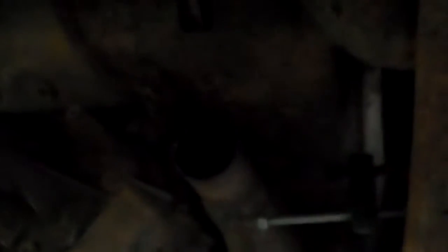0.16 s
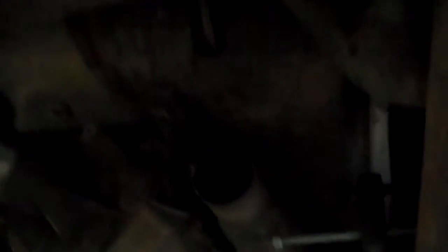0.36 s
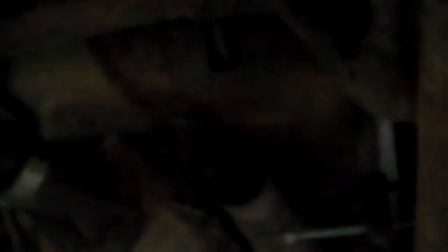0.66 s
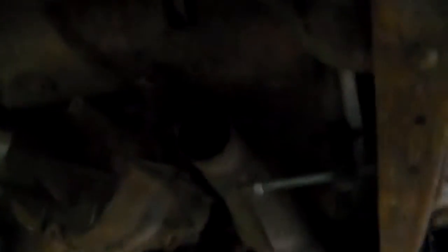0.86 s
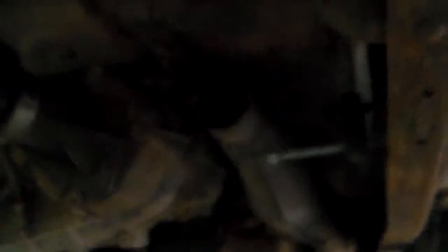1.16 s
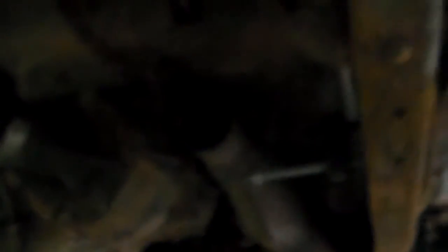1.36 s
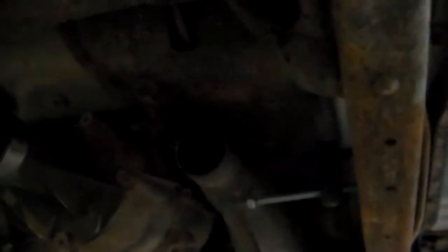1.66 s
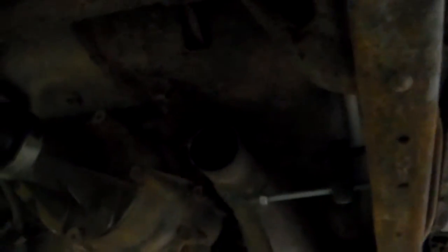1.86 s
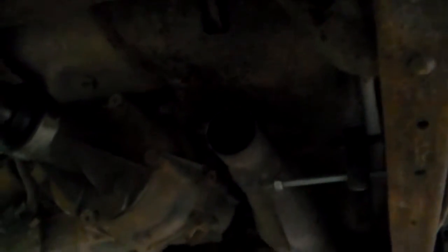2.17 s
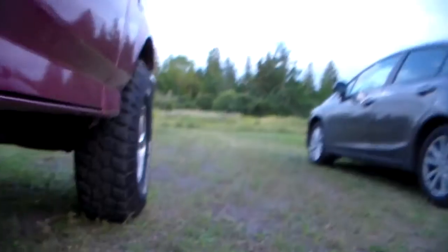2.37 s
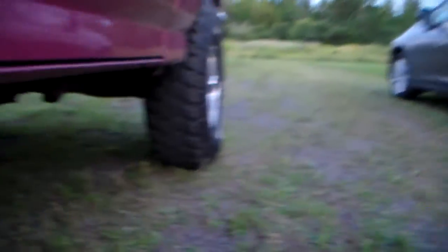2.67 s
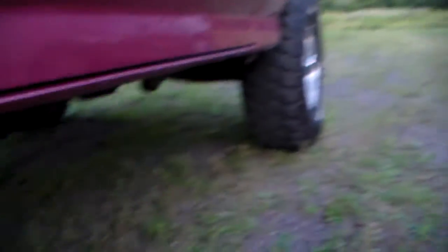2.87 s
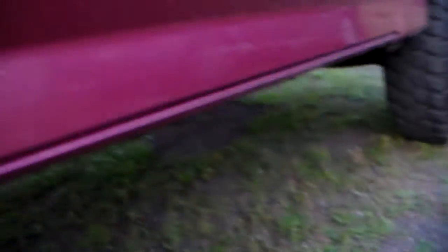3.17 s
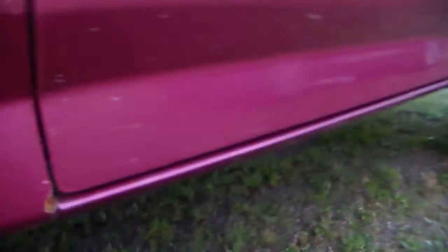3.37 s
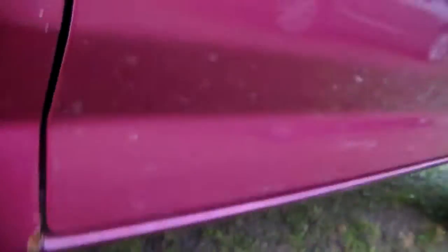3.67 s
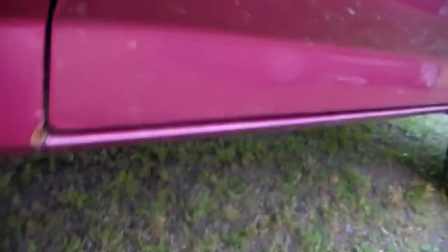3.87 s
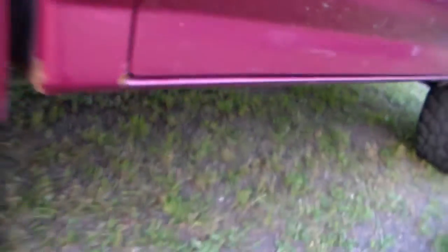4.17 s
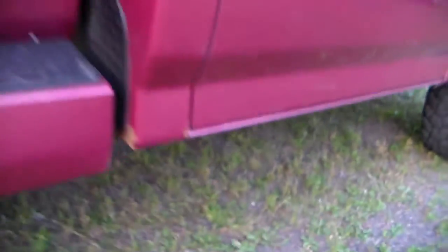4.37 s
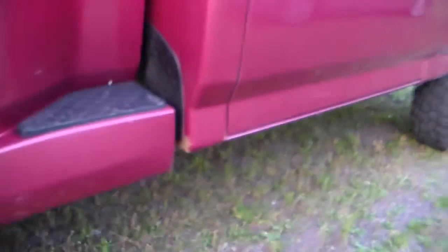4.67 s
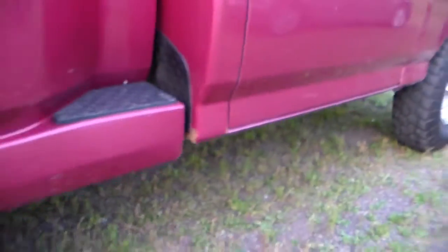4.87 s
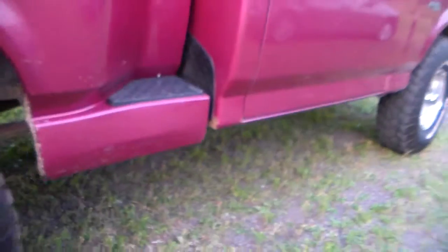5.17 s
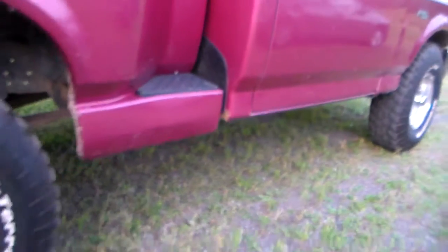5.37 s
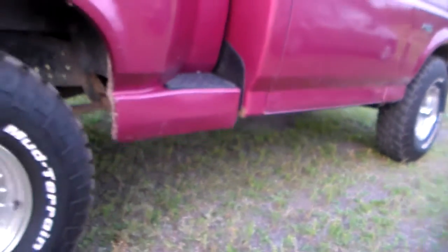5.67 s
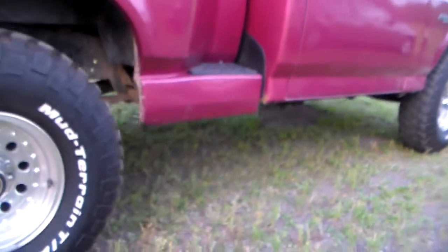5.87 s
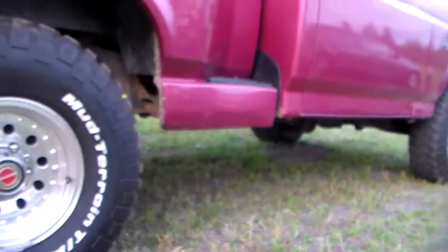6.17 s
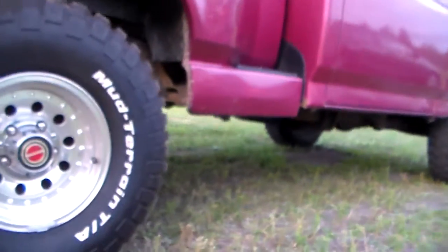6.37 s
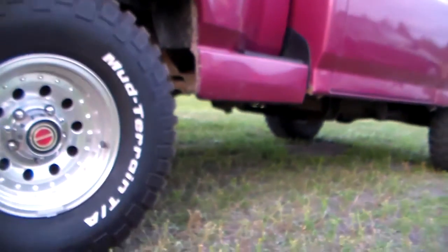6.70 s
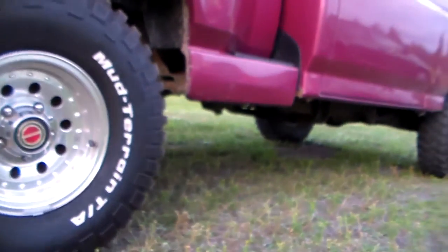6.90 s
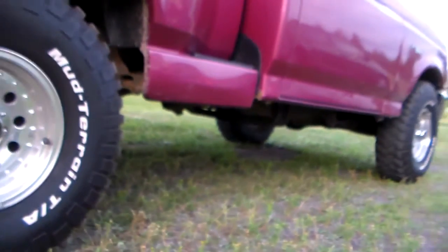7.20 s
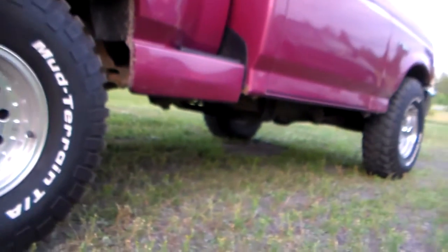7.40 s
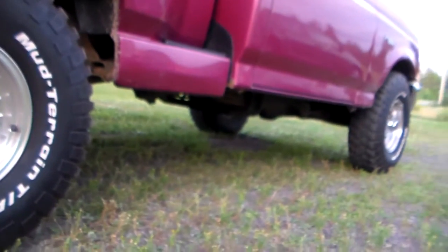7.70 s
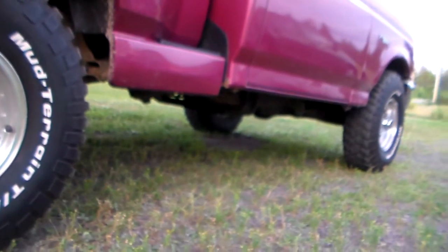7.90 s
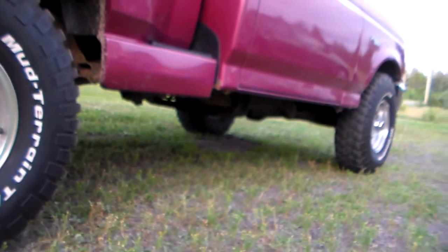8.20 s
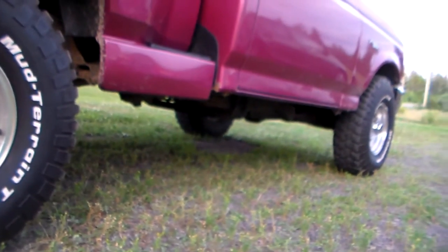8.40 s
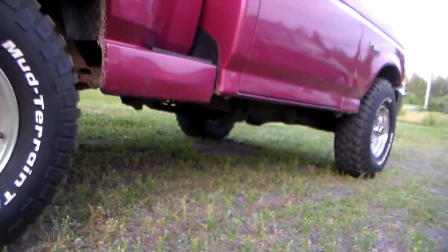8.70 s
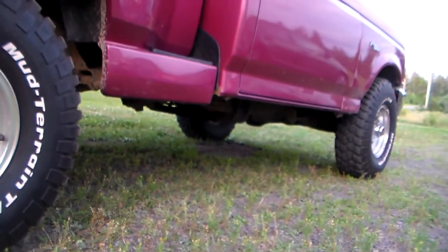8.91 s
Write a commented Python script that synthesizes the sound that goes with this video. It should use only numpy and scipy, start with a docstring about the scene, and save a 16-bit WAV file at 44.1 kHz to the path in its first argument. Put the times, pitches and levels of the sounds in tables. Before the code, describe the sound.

A V8 pickup with no muffler idles with a raspy, throbbing exhaust, loud from underneath, then suddenly quieter from beside it.

```python
"""An unmuffled V8 idles on grass. Each firing is an impulse that excites the low modes of the open pipe
and releases a turbulent jet, heard as a ringing rasp with sharp ticks. Three thin panels resonate,
and late burning adds pops. The microphone first lies under the truck by the pipe; after a hard cut
it stands beside the truck and drifts from the door to the rear wheel."""
import sys
import numpy as np
from scipy import signal
from scipy.io import wavfile
from scipy.ndimage import uniform_filter1d

SR = 44100
rng = np.random.default_rng(int(sys.argv[2]) if len(sys.argv) > 2 else 0)


def unload_audio(sound):
    """Save the sound as a 16-bit wav file, at the path given as the first command line argument."""
    columns = np.transpose(np.atleast_2d(sound))
    # keep every value between -1 and 1, then stretch to whole-number steps
    steps = np.round(np.clip(columns, -1, 1) * 32767)
    wavfile.write(sys.argv[1], SR, steps.astype(np.int16))


N = 399105

# A stance is 0 under the truck or 1 beside it. A place is 0 under, 1 by the door or 2 by the rear wheel.
# steady idle, a row per stance: firings_per_s, opening_count_firings
IDLE_BEAT = [(45.16, -4.72), (45.09, -4.95)]
# wander of the crank from that beat, per stance: time_s, lead_firings
CRANK_WANDER = [
    [(0.0, 0.0), (0.25, -0.08), (0.54, 0.07), (0.68, 0.01), (1.74, 0.01), (1.88, -0.09), (2.1, 0.1),
     (2.322, -0.07)],
    [(2.322, 0.02), (2.922, 0.1), (3.422, 0.02), (3.582, 0.16), (3.822, -0.08), (4.642, 0.02),
     (4.942, -0.13), (5.162, -0.02), (6.442, -0.04), (6.582, -0.21), (6.802, 0.0), (6.942, -0.16),
     (7.662, 0.17), (7.882, -0.01), (8.042, 0.15), (8.202, -0.04), (9.05, 0.14)],
]
# irregular burns, nearly all weak: time_s, change_db
ODD_BURNS = [(.54, -7.5), (.699, -2.5), (1.007, -7), (1.86, -6.5), (2.269, -3.5), (2.714, -2), (3.069, -4),
             (3.644, -3.5), (4.357, 1), (4.913, -0.5), (5.998, -3.5), (6.556, -3), (6.887, -4), (7.043, -5),
             (8.148, -4)]
# low modes of pipe and ground gap, per stance: pitch_hz, width_hz, travel_ms
PIPE_MODES = [
    [(44.2, 9.1, 3.7), (109.8, 14.0, 11.4), (132.7, 10.5, 2.0), (159.1, 34.5, 9.6)],
    [(41.9, 14.7, 3.1), (88.2, 26.7, 9.9), (109.9, 8.0, 1.1), (187.4, 8.0, 7.9)],
]
# cylinders in firing order, per stance: late_ms, kick_db for each of 4 modes, puff_db at 3 pitches
FIRING_ORDER = [
    [(-0.5, -12.5, -10.3, -16.5, -17.0, -1.3, -3.4, 0.3), (0.4, -11.8, -8.2, -35.4, -11.7, 0.4, -1.6, -0.9),
     (-0.3, -11.1, -13.1, -18.7, -15.5, -0.6, -0.5, 2.9),
     (-0.3, -14.3, -10.2, -23.3, -14.9, -1.8, -1.6, -3.4), (0.7, -11.8, -3.8, -24.1, -13.2, 2.1, 2.1, -0.8),
     (-0.3, -12.6, -9.0, -15.4, -17.2, 0.3, -2.4, 0.9), (0.1, -14.7, -6.7, -22.4, -11.0, -1.5, 0.4, -1.0),
     (0.2, -12.7, -3.0, -17.0, -11.3, 0.9, 3.0, -0.7)],
    [(-0.7, -19.9, -19.2, -23.2, -34.6, -2.8, -3.4, -0.5),
     (-0.1, -18.3, -15.5, -43.2, -60.8, -1.4, 1.2, -1.4),
     (0.6, -16.5, -18.3, -32.9, -34.5, -0.4, 1.3, -0.4),
     (-0.7, -19.9, -18.6, -22.6, -33.9, -2.7, -2.2, 0.3),
     (0.6, -15.9, -21.4, -35.8, -56.5, 1.8, -2.1, -0.5),
     (-0.8, -17.5, -21.9, -29.0, -34.6, -0.5, -1.5, 1.4),
     (-0.1, -16.7, -17.2, -29.7, -39.1, -0.2, 0.6, -1.1), (1.2, -16.2, -17.1, -57.5, -32.8, 2.9, 2.5, 1.3)],
]
# pitches of those three puff columns: low_hz, middle_hz, high_hz
PUFF_PITCHES = (1200, 3000, 9000)
# burn-to-burn deviation of the kicks, a row per stance: spread_db for each of 4 modes
KICK_SPREAD = [(0.3, 1.0, 1.1, 1.1), (0.37, 1.5, 1.8, 2.2)]
# low pulses at normal burn, per stance: time_s, level_db
BOOM_LEVEL = [
    [(0.0, -7.5), (0.6, -9), (2.32, -9)],
    [(2.33, -18), (4.3, -18), (6.5, -19), (9.05, -19)],
]
# the two jets of a firing, a row per stance:
# start_firings, rise_firings, fall_firings, second_delay_firings, second_db, steady_flow_db
JET_SHAPE = [(0.289, 0.035, 0.31, 0.39, -8, -10.5), (.38, 0.046, 0.27, .35, -9.5, -6.5)]
# rasp at normal burn, per stance: time_s, level_db, treble_tilt_db_per_octave
RASP_LEVEL = [
    [(0.0, -28.5, 2), (0.3, -31.5, -1.5), (0.45, -30, 3), (0.66, -33.5, -5), (0.88, -31.5, 2.5),
     (1.05, -32.5, 1), (1.4, -31.5, 0), (2.32, -31, -1)],
    [(2.33, -48.5, -1.5), (2.5, -48, -0.5), (3.0, -47.5, -2), (4.2, -48, 0), (5.3, -46, -3.5),
     (6.0, -45, -2), (6.6, -46, 1), (7.6, -45.5, -3.5), (9.05, -46, -3.5)],
]
# likeness of the jet noise in the two microphone ports: frequency_hz, coherence
PORT_COHERENCE = [(300, 0.99), (1200, 0.97), (2500, 0.88), (5000, 0.65), (8000, 0.12), (13000, 0.51)]
# broadband spectrum of the rasp, per place: frequency_hz, relative_db
RASP_SPECTRA = [
    [(130, -18), (220, -2), (300, -14.5), (430, -19), (600, -13.5), (850, -22.5), (1200, -6), (1600, -17.5),
     (2500, -13.5), (3600, -24), (4700, -21), (5700, -22), (7800, -35.5), (13500, -35)],
    [(130, -22.5), (220, 1), (300, -1.5), (430, -14.5), (600, -9.5), (850, -13), (1200, -10), (1600, -17.5),
     (2500, -17), (3600, -22.5), (4700, -25), (5700, -28), (7800, -34), (13500, -39)],
    [(130, -23), (220, -0.5), (300, -3), (430, -11), (600, -16), (850, -22), (1200, -15), (1600, -20),
     (2500, -18.5), (3600, -28), (4700, -30.5), (5700, -24.5), (7800, -44), (13500, -47)],
]
# resonances of pipe end, frame and ground gap, per place: pitch_hz, width_hz, relative_db
RING_MODES = [
    [(1110, 73, -2.5), (1440, 14, 1.5), (1709, 18, -3.5), (2259, 56, 0), (2663, 134, -5), (2890, 18, -20),
     (3220, 45, -7), (3497, 46, -5), (3610, 68, -9), (5350, 54, -13), (5930, 120, -18)],
    [(1100, 20, 2.5), (1723, 6.7, -3.5), (2097, 31, -2.5), (2560, 58, -3.5), (3357, 68, -11.5),
     (5030, 89, -19), (5810, 60, -15.5)],
    [(1200, 33, 2), (1725, 13, -7.5), (2484, 150, -7), (3700, 99, -11.5), (3870, 48, -16),
     (5190, 57, -20.5), (5550, 150, -25)],
]
# resonance of each thin panel: pitch_hz, width_hz
PANEL_MODES = [(709, 6.6), (664.7, 5.3), (523.4, 19)]
# vibration of the panels, per stance: time_s, level_db for each of 3 panels
PANEL_LEVELS = [
    [(0.0, -41, -48, -43), (0.5, -34, -57, -43), (1.2, -40, -47, -45.5), (1.57, -34.5, -61, -46.5),
     (1.72, -42.5, -51, -49), (2.07, -33, -60, -47), (2.32, -41.5, -52, -43)],
    [(2.33, -43, -47, -47), (3.0, -56.5, -50.5, -57.5), (3.8, -44.5, -49, -49), (4.3, -45, -48, -65),
     (5.0, -54, -45, -60), (5.5, -56, -53.5, -54), (6.1, -56, -57, -73), (6.6, -48, -51, -59),
     (7.6, -46, -50.5, -58.5), (9.05, -52, -46.5, -52)],
]
# size of the faintest ticks before filtering: time_s, level_db
TICK_FLOOR = [(0, -32), (2.32, -25.5), (2.33, -33.5), (3.2, -33), (4.5, -40.5), (6, -39.5), (9.05, -38.5)]
# spectrum of a tick: frequency_hz, gain_db
TICK_SPECTRUM = [(1500, -32), (4000, -8), (7000, -7.5), (11000, -1.5), (14000, -10)]
# pops of late burning, per stance: start_s, level_db, pitch_hz
LATE_BURNS = [
    [(0.0692, -18, 2580), (0.0877, -13, 2250), (0.1321, -16, 1010), (0.1999, -19, 1180),
     (0.3765, -16.5, 1170), (0.4209, -12, 2550), (0.4399, -13, 1100), (0.5511, -20, 2370),
     (0.621, -20, 2060), (0.7327, -19, 2670), (0.7741, -22, 2320), (0.7971, -8, 2590), (0.8395, -16, 2630),
     (0.9073, -13.5, 3640), (1.1513, -12.5, 2190), (1.5698, -19, 1100), (1.6162, -11, 1140),
     (1.6821, -18, 1750), (1.7948, -19, 1110), (2.0807, -16, 2280), (2.1495, -15, 2400),
     (2.2149, -16, 2290)],
    [(3.1265, -29, 1090), (3.3026, -32, 1100), (3.5241, -27, 2530), (3.6598, -23, 2570),
     (4.3722, -36, 1270), (4.483, -24, 1230), (4.5478, -27, 1270), (4.6611, -22.5, 1250),
     (4.7259, -31, 1120), (4.7693, -28, 2450), (5.0582, -29, 2480), (5.0811, -32, 1230),
     (5.5904, -26, 2370), (5.7256, -28, 1200), (5.7935, -22, 1240), (5.8354, -31, 1200),
     (5.8543, -33, 1130), (5.9012, -24, 1230), (5.9481, -29, 920), (5.9666, -24, 1180), (6.0125, -22, 2310),
     (6.0788, -23.5, 2090), (6.1467, -20, 1194), (6.3218, -30, 1200), (6.6775, -40, 1200),
     (6.7224, -22.5, 2530), (6.8551, -27, 2730), (6.902, -30, 2520), (7.2741, -26, 2540),
     (8.0943, -24, 2540), (8.1641, -31, 1170), (8.2075, -32, 1190), (8.3397, -38, 1180),
     (8.4504, -19.5, 1200), (8.5178, -24, 1200), (8.9802, -30, 1210)],
]
# imbalance of the two ports: frequency_hz, left_over_right_db
PORT_BALANCE = [(60, -1.14), (200, -1), (600, 0.8), (1400, -0.4), (3000, -1.5), (6000, -2.4), (9500, 3),
                (13000, 2)]

CUT_S, WALK_START_S, WALK_END_S = 2.322, 4.55, 6.96
LOPE_PERIOD, LOPE_TOP, LOPE_LAG = 16, 0.6, 1.4  # firings: two engine cycles, strongest burn, crank lag
LOPE_LEAD_FIRINGS, LOPE_DB, KICK_SIGMA_MS = (0.05, 0), (0.7, 0.04), (0.49, 0.062)  # per stance
BROADBAND_DB, RINGING_DB = (-3, -1, -4), (-3, -1, 0)  # the two parts of the rasp, per place
BURN_BOOM, BURN_TILT = 0.59, 0.7  # dB of boom and dB per octave of treble for each dB of burn


def gain_of(db):
    """Amplitude ratio of a level in decibels."""
    return 10 ** (np.asarray(db) / 20)


def unit_rms(x):
    """Normalisation to a mean power of 1."""
    return x / np.sqrt(np.mean(x ** 2) + 1e-20)


def spectrum_at(points, hz):
    """Interpolation of a spectrum on a logarithmic frequency axis."""
    known_hz, value = np.transpose(points)
    return np.interp(np.log(hz + 1), np.log(known_hz + 1), value)


def curves_at(rows, t):
    """Linear interpolation of each column of a table in time."""
    time_s, *columns = np.transpose(rows)
    return [np.interp(t, time_s, column) for column in columns]


def coloured(x, gain):
    """Minimum-phase filtering, with gains evenly spaced from 0 Hz to half the sample rate."""
    log_gain = np.log(np.maximum(np.r_[gain, gain[-2:0:-1]], 1e-5))
    taps = np.fft.ifft(np.exp(np.conj(signal.hilbert(log_gain)))).real[:len(gain)]
    return signal.oaconvolve(x, taps.reshape((1,) * (x.ndim - 1) + (-1,)), axes=-1)[..., :x.shape[-1]]


def impulses(t, times_s, size):
    """An impulse train, each impulse shared between its two nearest samples."""
    position = np.clip((times_s - t[0]) * SR, 0, len(t) - 2)
    index, train = position.astype(int), np.zeros(len(t))
    np.add.at(train, index, size * (1 - position + index))
    np.add.at(train, index + 1, size * (position - index))
    return train


def crank_phase(t, start_s, stance):
    """Phase modulation: the count of firings is a steady beat plus wander and a periodic lope."""
    firings_per_s, opening_count = IDLE_BEAT[stance]
    steady = opening_count + firings_per_s * (t - start_s)
    lope = np.cos(2 * np.pi * (steady - LOPE_TOP - LOPE_LAG) / LOPE_PERIOD)
    return steady + curves_at(CRANK_WANDER[stance], t)[0] + LOPE_LEAD_FIRINGS[stance] * lope


def burn_strength(t, crank, stance, half_width_s=0.013):
    """Amplitude modulation in dB: the burn swings with the lope and dips at weak firings."""
    changes = sum(db * np.exp(-((t - time_s) / half_width_s) ** 2) for time_s, db in ODD_BURNS)
    return LOPE_DB[stance] * np.cos(2 * np.pi * (crank - LOPE_TOP) / LOPE_PERIOD) + changes


def pipe_boom(t, crank, stance, shared=0.75):
    """Modal superposition: each firing kicks every low mode into a damped sine after its travel time."""
    count = np.arange(np.ceil(crank[0]), crank[-1])
    cylinder = np.array(FIRING_ORDER[stance])[count.astype(int) % 8]
    chance = rng.standard_normal((len(count), 5))
    # the three upper modes vary partly together
    chance[:, 1:4] = shared * chance[:, 4:] + np.sqrt(1 - shared ** 2) * chance[:, 1:4]
    age_s, modes = np.arange(SR // 4) / SR, 0
    for k, (pitch_hz, width_hz, travel_ms) in enumerate(PIPE_MODES[stance]):
        arrival_s = np.interp(count, crank, t) + (cylinder[:, 0] + travel_ms) / 1000
        kicks = impulses(t, arrival_s, gain_of(cylinder[:, 1 + k] + KICK_SPREAD[stance][k] * chance[:, k]))
        response = np.exp(-np.pi * width_hz * age_s) * np.sin(2 * np.pi * pitch_hz * age_s)
        modes = modes + signal.oaconvolve(kicks, response)[:len(t)]
    kick_shape = signal.windows.gaussian(301, KICK_SIGMA_MS[stance] * SR / 1000)
    boom = signal.oaconvolve(modes, kick_shape, "same")
    return unit_rms(boom - boom.mean())


def jet_flow(crank, stance):
    """Pulsating flow: two jets a firing rise and decay. Gives the firing count and the flow, peak 1."""
    start, rise, fall, delay, second_db = JET_SHAPE[stance][:5]
    count, phase = np.floor(crank - start).astype(int), (crank - start) % 1
    jet = lambda age: (1 - np.exp(-np.maximum(age, 0) / rise)) * np.exp(-age / fall)
    flow = jet(phase) + gain_of(second_db) * jet(phase - delay)
    return count, flow / flow.max()


def cylinder_colours(stance, hz):
    """Spectral envelope of each cylinder's puff, in dB at the given frequencies."""
    return np.array([spectrum_at(list(zip(PUFF_PITCHES, row[5:])), hz) for row in FIRING_ORDER[stance]])


def jet_noise(t, crank, stance, treble_tilt, whole_db=0.96, patchy_db=4.5, narrowing=0.27):
    """Turbulence: noise follows the flow, coloured anew at each firing, partly coherent in two ports."""
    hz, frames = np.fft.rfftfreq(128, 1 / SR), np.arange(len(t) // 32 + 2) * 32
    count, flow = jet_flow(np.interp(frames, np.arange(len(t)), crank), stance)
    chance = rng.standard_normal((count[-1] - count[0] + 1, len(hz) + 1))
    patches = unit_rms(uniform_filter1d(chance[:, 1:], size=3, axis=1))
    firing_db = whole_db * chance[:, :1] + patchy_db * patches
    colour_db = firing_db[count - count[0]] + cylinder_colours(stance, hz)[count % 8]
    octaves = np.clip(np.log2(hz / 3000 + 1e-9), 0, 2)  # above 3 kHz
    puffs = flow[:, None] ** (1 + narrowing * octaves) * gain_of(colour_db)  # briefer in the treble
    envelope = puffs + gain_of(JET_SHAPE[stance][5])
    tilt_db = np.interp(frames, np.arange(len(t)), treble_tilt)[:, None] * octaves
    a, b, c, d = rng.standard_normal((4, len(frames), len(hz)))
    coherence = np.clip(spectrum_at(PORT_COHERENCE, hz), 0, 1)
    left = a + 1j * b
    right = coherence * left + np.sqrt(1 - coherence ** 2) * (c + 1j * d)
    spectra = np.array([left, right]) * envelope * gain_of(tilt_db)
    return signal.istft(spectra.transpose(0, 2, 1), nperseg=128, noverlap=96)[1][:, :len(t)]


def broadband_rasp(gas, place):
    """Spectral shaping: jet noise as heard at one place, scaled by its power from 900 to 7000 Hz."""
    hz = np.linspace(0, SR / 2, num=1025)
    gain = gain_of(spectrum_at(RASP_SPECTRA[place], hz))
    middle_rms = np.sqrt(np.sum(gain[(hz > 900) & (hz < 7000)] ** 2) / len(hz))
    return coloured(gas, gain_of(BROADBAND_DB[place]) * gain / middle_rms)


def ringing_rasp(crank, stance, place, spread_db=8.5, steady_db=-12):
    """Forced resonance: the jets drive pipe end, frame and ground gap; each firing favours other modes."""
    count, flow = jet_flow(crank, stance)
    gas, rings = rng.standard_normal(len(crank)), 0
    chance = np.minimum(rng.standard_normal((count[-1] - count[0] + 1, len(RING_MODES[place]))), 1.7)
    for k, (pitch_hz, width_hz, db) in enumerate(RING_MODES[place]):
        drive_db = spread_db * chance[count - count[0], k] + cylinder_colours(stance, pitch_hz)[count % 8]
        drive = gas * (flow * gain_of(drive_db) + gain_of(steady_db))
        resonator = signal.iirpeak(pitch_hz, pitch_hz / width_hz, SR)
        rings = rings + gain_of(db) * signal.lfilter(*resonator, drive)
    return gain_of(RINGING_DB[place]) * unit_rms(rings)


def panel_hum(t, pitch_hz, width_hz):
    """Random vibration: a shaken thin sheet responds as noise held in one narrow resonance."""
    pole = np.exp(-np.pi * width_hz / SR)
    a, b = rng.standard_normal((2, len(t)))
    amplitude = signal.lfilter([1 - pole], [1, -pole], a + 1j * b)
    return unit_rms((amplitude * np.exp(2j * np.pi * pitch_hz * t)).real)


def jet_ticks(t, crank, stance, spread_db=5.0):
    """Broadband transients: a tick as each jet opens, most faint, a few loud."""
    count = np.arange(np.ceil(crank[0]), crank[-1])
    start, delay = JET_SHAPE[stance][0], JET_SHAPE[stance][3]
    chance = rng.random((2 * len(count), 3))
    openings = np.r_[count + start + 0.07, count + start + delay + 0.04]
    times_s = np.interp(openings + 0.17 * chance[:, 0], crank, t)
    size = gain_of(curves_at(TICK_FLOOR, times_s)[0] - spread_db * np.log(1.01 - chance[:, 1]))
    side = 1.6 * (chance[:, 2] - 0.5)  # sets both level and delay between the ports
    left = impulses(t, times_s, size * (1 + side))
    right = impulses(t, times_s + side / 9000, size * (1 - side))
    colour_db = spectrum_at(TICK_SPECTRUM, np.linspace(0, SR / 2, num=257))
    return coloured(np.array([left, right]), gain_of(colour_db))


def late_pops(t, stance, rise_s=0.003, t60_s=0.026):
    """Damped oscillation: late burning gives a short, noisy burst around one pitch."""
    pops, age_s = np.zeros(len(t)), np.arange(SR // 16) / SR
    for start_s, level_db, pitch_hz in LATE_BURNS[stance]:
        a, b = uniform_filter1d(rng.standard_normal((2, len(age_s))), size=50, axis=1)
        fuzz = 1 + 0.18 * unit_rms(a) + 0.8j * unit_rms(b)
        envelope = (1 - np.exp(-age_s / rise_s)) * gain_of(level_db - 60 * age_s / t60_s)
        burst = (fuzz * np.exp(2j * np.pi * pitch_hz * age_s)).imag * envelope
        span = pops[round((start_s - t[0]) * SR):][:len(age_s)]
        span += burst[:len(span)]
    return pops


def idling_engine(stance, start_s, end_s):
    """Superposition of all sources at one stance; an unheard half second lets the resonances build."""
    t = np.arange(round(start_s * SR) - SR // 2, round(end_s * SR)) / SR
    crank = crank_phase(t, start_s, stance)
    burn_db = burn_strength(t, crank, stance)
    boom_db = curves_at(BOOM_LEVEL[stance], t)[0] + BURN_BOOM * burn_db
    boom = pipe_boom(t, crank, stance) * gain_of(boom_db)
    rasp_db, treble_tilt = curves_at(RASP_LEVEL[stance], t)
    gas = unit_rms(jet_noise(t, crank, stance, treble_tilt + BURN_TILT * burn_db))
    walked = np.clip((t - WALK_START_S) / (WALK_END_S - WALK_START_S), 0, 1)
    shares = {0: 1} if stance == 0 else {1: 1 - walked, 2: walked}  # the door gives way to the rear wheel
    # coherent noise crossfades in amplitude, independent ringing in power
    rasp = sum(share * broadband_rasp(gas, place) + np.sqrt(share) * ringing_rasp(crank, stance, place)
               for place, share in shares.items())
    rasp = rasp * gain_of(rasp_db + burn_db)
    panels_db = curves_at(PANEL_LEVELS[stance], t)
    panels = sum(gain_of(db) * panel_hum(t, *mode) for db, mode in zip(panels_db, PANEL_MODES))
    return (boom + rasp + panels + jet_ticks(t, crank, stance) + late_pops(t, stance))[:, SR // 2:]


def scene():
    """One source from two stances joined by a hard cut: under the truck, then beside it."""
    return np.hstack([idling_engine(0, 0, CUT_S), idling_engine(1, CUT_S, N / SR)])


def record(dry, band_limit_hz=13650):
    """Transduction: the two ports differ in colour, the loudest crests clip, and the band is limited."""
    lean_db = spectrum_at(PORT_BALANCE, np.linspace(0, SR / 2, num=513)) / 2
    ports = np.array([coloured(dry[0], gain_of(lean_db)), coloured(dry[1], gain_of(-lean_db))])
    lowpass = signal.firwin(511, band_limit_hz, window=("kaiser", 9), fs=SR)
    return np.clip(signal.oaconvolve(np.clip(ports, -1, 1), lowpass[None], "same"), -1, 1)


dry = scene()
out = record(dry)
unload_audio(out)
```